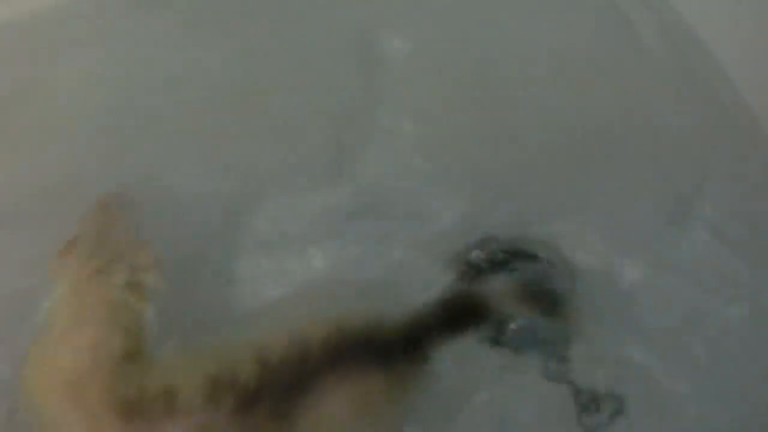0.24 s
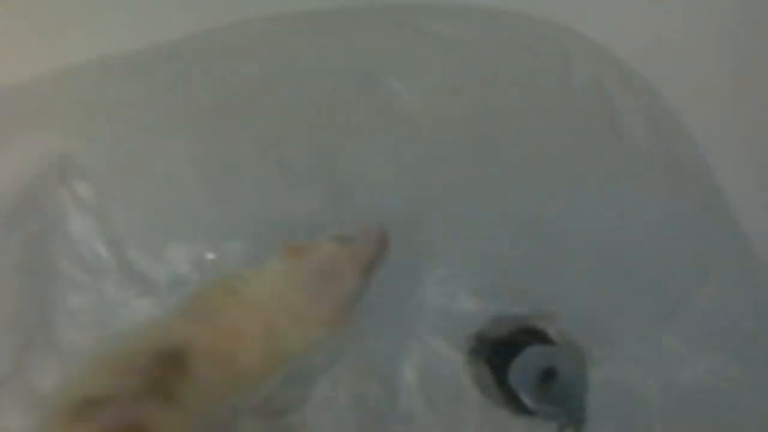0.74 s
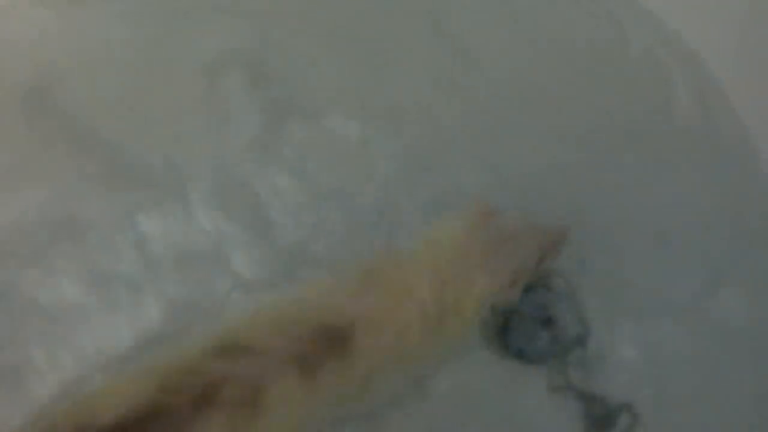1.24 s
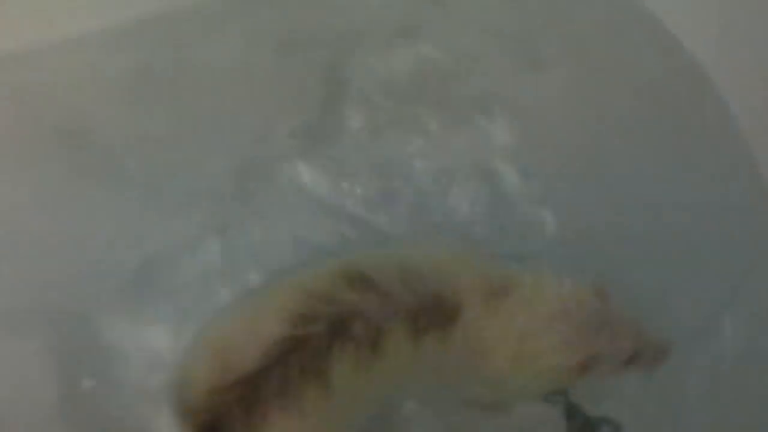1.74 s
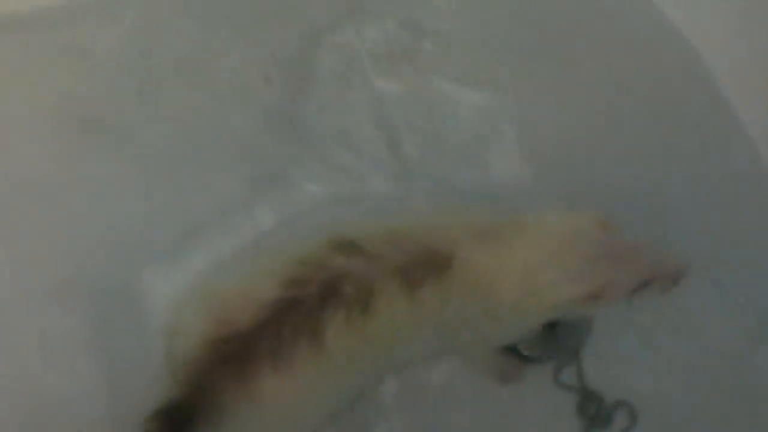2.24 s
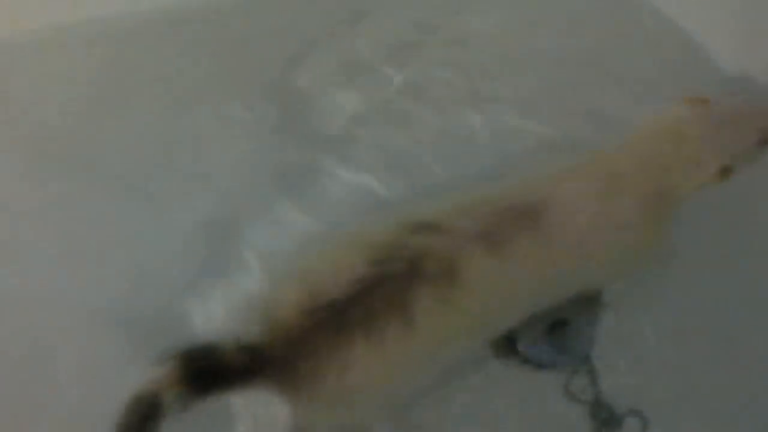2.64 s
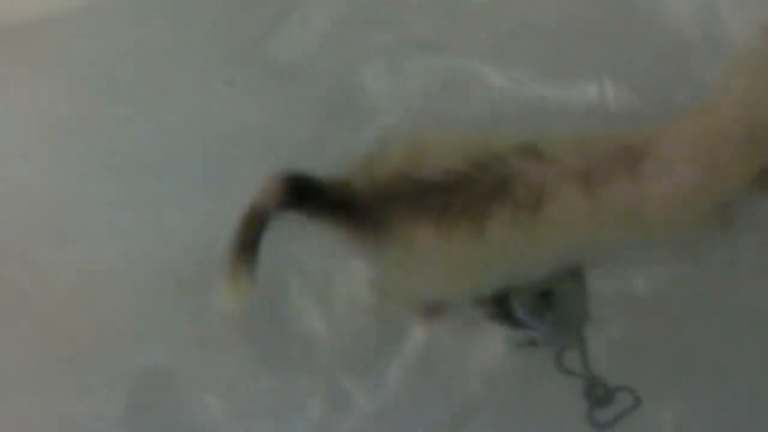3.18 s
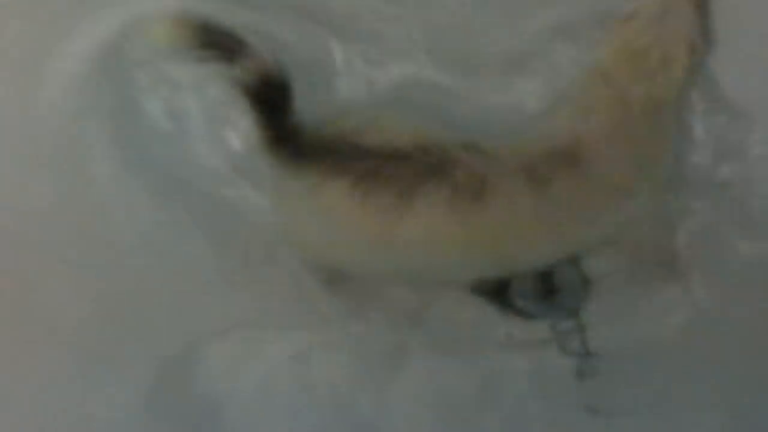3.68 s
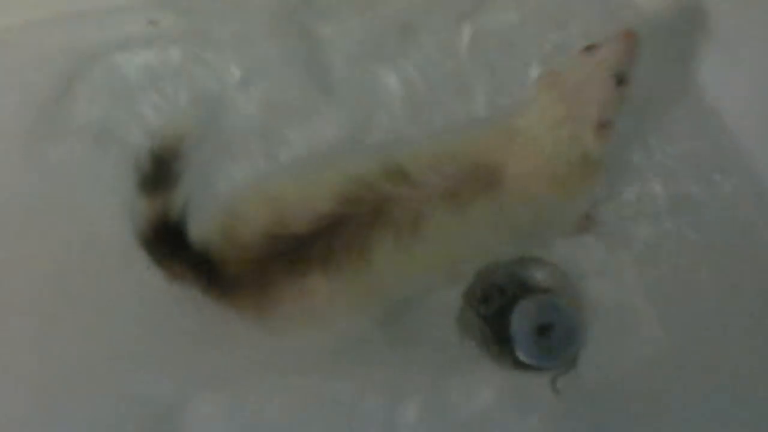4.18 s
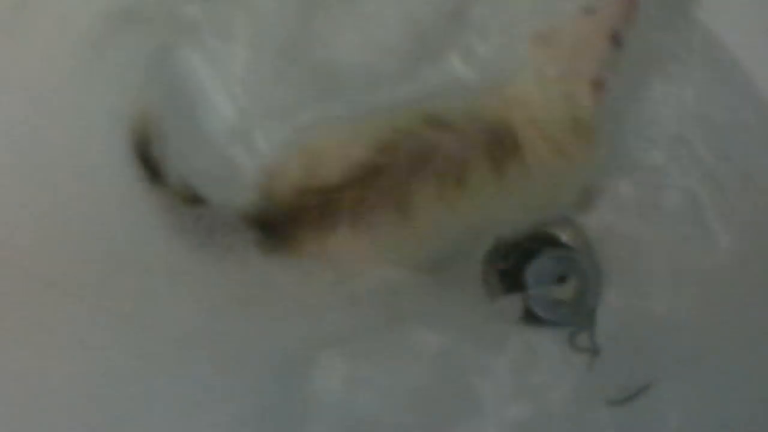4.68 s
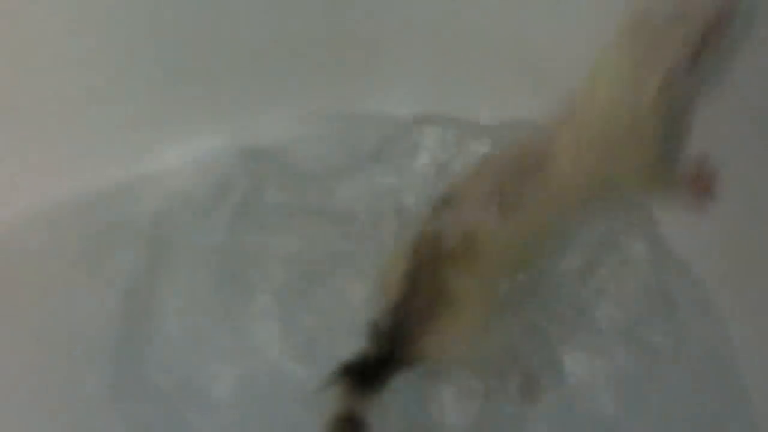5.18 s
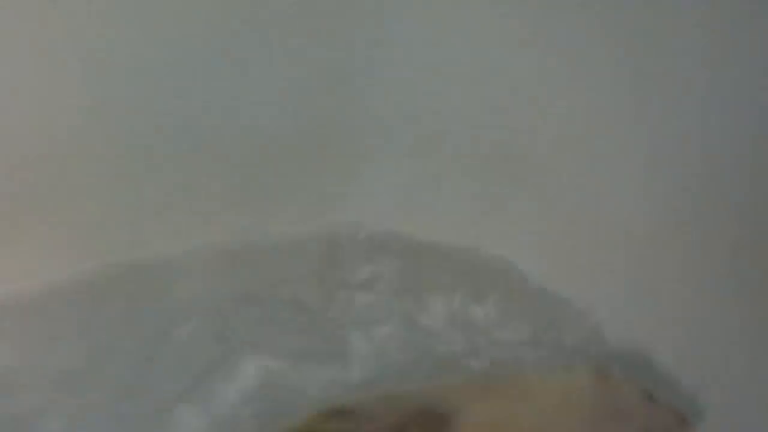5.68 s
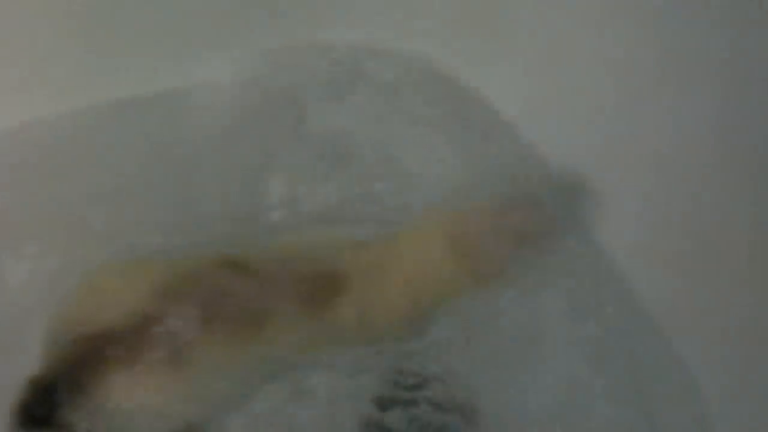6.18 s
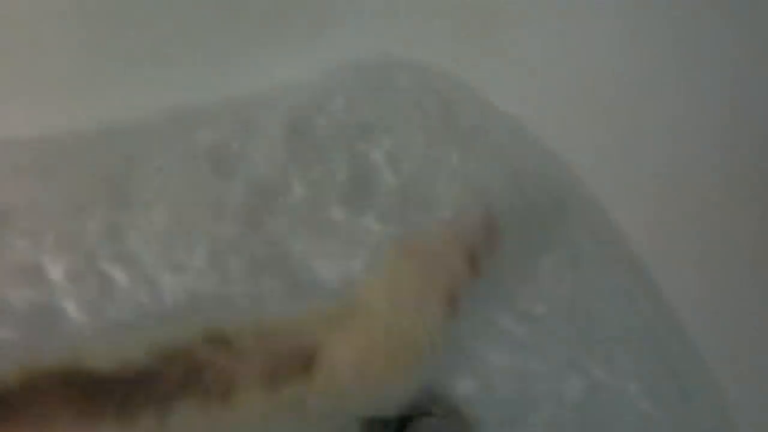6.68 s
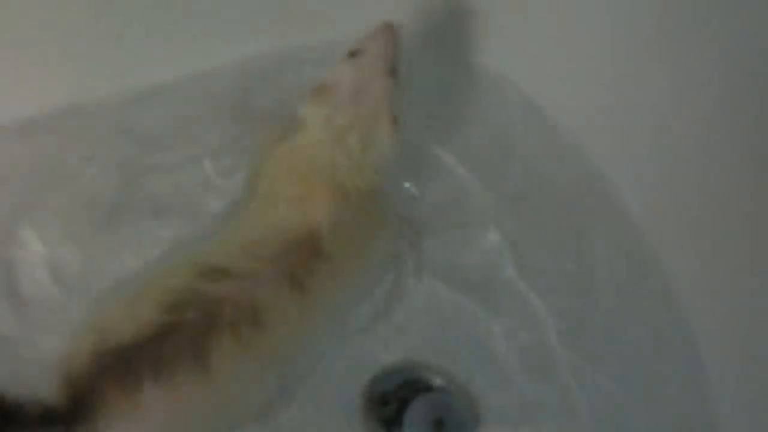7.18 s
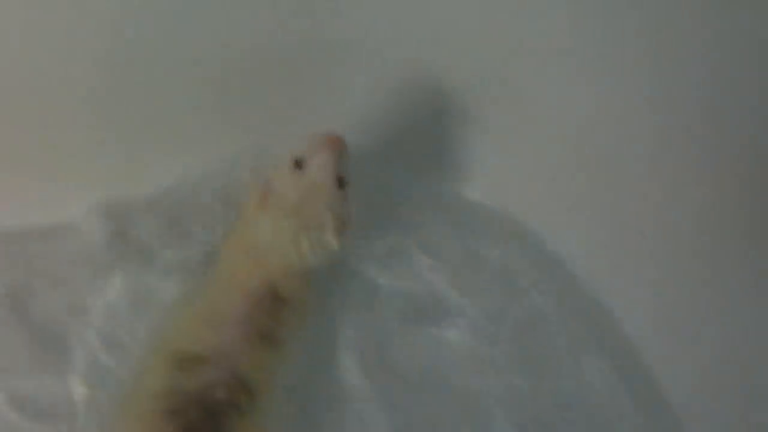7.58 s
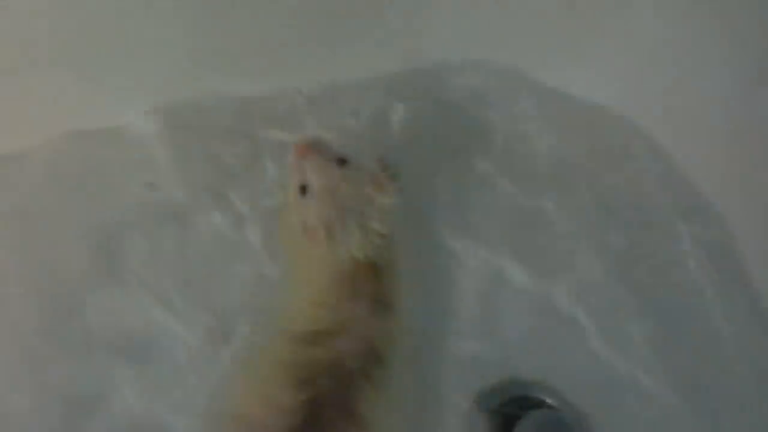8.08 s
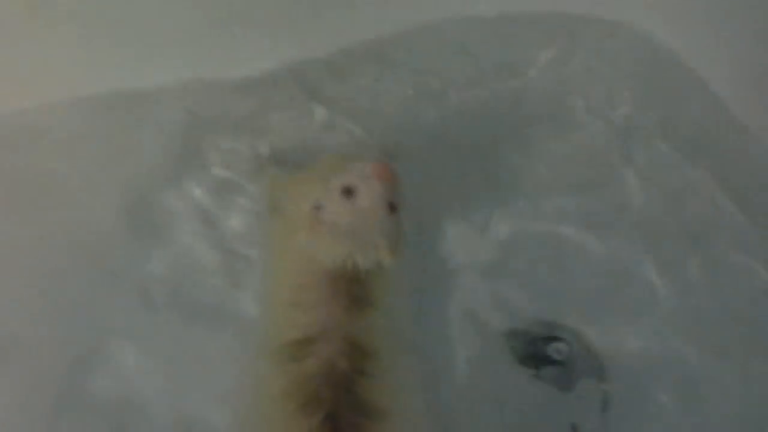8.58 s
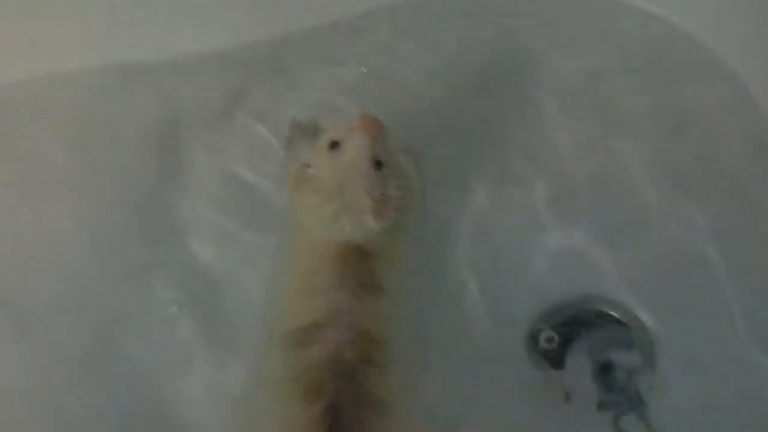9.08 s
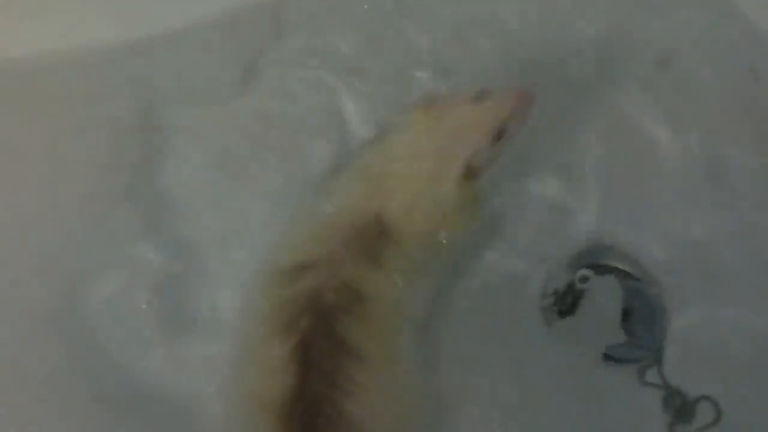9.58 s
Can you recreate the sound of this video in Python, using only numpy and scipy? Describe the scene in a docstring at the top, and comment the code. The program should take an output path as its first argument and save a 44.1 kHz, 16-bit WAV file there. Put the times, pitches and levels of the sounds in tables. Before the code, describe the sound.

A close stereo microphone catches a ferret paddling in a shallow bathtub in a small, hard room with short bright reflections, over low, steady, slightly wavering room noise. A quick swish of wet fur opens at 0 s, followed by near quiet with a faint tick. From 0.9 to 1.25 s, quick paw slaps splash with bubbles and fine spray. Soft swishes and tiny drips follow, then one sharp watery plip at 3.0 s and faint stirring near 3.6 s. At 4.9-5.3 s comes the fullest splash, with ringing bubbles, gurgle and a soft tub thud; a click and drip follow at 5.4 s. A brighter, crackling flurry runs from 6.15 to 6.5 s. A small rising gurgle sounds at 7.3 s, then dull handling knocks near 7.85 s. Faint rustles and sparse ticks continue to about 9.7 s.

```python
"""A swish of wet fur opens the scene; then a ferret paddles in bursts in a shallow bathtub, close by.
Paw slaps are grainy noise bursts, bubbles and a few clicks are rising sine rings, and spray is noise with
droplet crackle. Drops and claws tick, the tub thuds softly on damped low modes, and a hand knocks the
camera's case. Tub-wall echoes and the tail of a small hard room follow the water; steady coloured noise
lies beneath."""
import sys
import numpy as np
from scipy import signal
from scipy.fft import rfft, irfft
from scipy.io import wavfile
from scipy.ndimage import uniform_filter1d

SR = 44100
rng = np.random.default_rng(int(sys.argv[2]) if len(sys.argv) > 2 else 0)


def digitize_waveform(pressure):
    """Quantize a signal to 16-bit integers and store it at the path in sys.argv[1].

    Rows of a 2-D input are taken as channels; values are limited to [-1, 1].
    """
    field = np.atleast_2d(pressure).T
    bounded = np.clip(field, -1, 1)
    quanta = np.round(bounded * 32767).astype(np.int16)
    wavfile.write(sys.argv[1], SR, quanta)


N = 433944
TIME = np.arange(N) / SR
FREQS = np.fft.rfftfreq(N, 1 / SR)
SIDES = np.array([[.5], [-.5]])  # shares a left-minus-right difference between the channels


def amp(db):
    """Decibels to gain."""
    return 10 ** (np.asarray(db) / 20)


def unit(x):
    """Scales to rms 1."""
    return x / np.sqrt(np.mean(x ** 2) + 1e-20)


def read(points, hz):
    """Reads a table on a log-frequency axis."""
    f, value = np.transpose(points)
    return np.interp(np.log(hz + 1), np.log(f + 1), value)


def add(mix, s, sound):
    """Adds a sound into the mix at time s, cut off at the end of the mix."""
    part = mix[:, max(round(s * SR), 0):][:, :sound.shape[1]]
    part += sound[:, :part.shape[1]]


def colour(x, db):
    """Filters a full-length signal by a gain in dB for each frequency."""
    return irfft(rfft(x) * amp(db), N)


def drift(pace):
    """Slow chance: a new random value every pace seconds, joined by straight lines."""
    knots = rng.standard_normal(1024)
    return np.interp(TIME, np.arange(len(knots)) * pace, knots)


# Likeness of the two microphones in diffuse sound. Each row: frequency in Hz, correlation from 0 to 1.
MIC_LIKENESS = [(50, .86), (200, .84), (500, .95), (1200, .93), (2500, .75), (4500, .45), (9000, .4),
                (16000, .45)]


def diffuse(pair, likeness=MIC_LIKENESS):
    """Blends two unrelated signals so that the channels are as alike as the table asks at each pitch."""
    a, b = rfft(pair)
    same = np.clip(read(likeness, np.fft.rfftfreq(pair.shape[1], 1 / SR)), -1, 1)
    left = same * a + np.sqrt(1 - same ** 2) * b
    return irfft(np.array([left, a]), pair.shape[1])


def impact(pitch, bass_db, treble_db, decay, ring_db, ring_octaves, attack, grain_db, count=6):
    """A brief grainy burst, boosted around the given pitch."""
    t, hz = np.arange(2048) / SR, np.fft.rfftfreq(2048, 1 / SR)
    noise, flicker = rng.standard_normal((2, len(t))), rng.standard_normal((count, 1, len(t)))

    # bass, middle and treble levels, spread over the width of each band
    band_hz, band_width = np.array([1100, 3300, 10000]), np.array([1200, 4200, 10000])
    per_hz = np.array([bass_db, 0, treble_db]) - 10 * np.log10(band_width)
    gain = amp(read(np.c_[band_hz, per_hz], hz))
    gain *= hz ** 2 / (hz ** 2 + 650 ** 2)  # thins out the low end
    octaves_off = np.log2((hz + 1) / pitch)
    gain *= amp(ring_db * np.exp(-(octaves_off / ring_octaves) ** 2))

    # droplets of each size sound in their own band and come in their own clumps
    centres = np.geomspace(1500, 14000, count)
    sizes = np.array([np.interp(hz, centres, one) for one in np.eye(count)])
    droplets = irfft(rfft(diffuse(noise)) * gain * sizes[:, None])
    clumps = amp(grain_db * np.clip(unit(uniform_filter1d(flicker, size=48)), -2, 2))
    shape = (1 - np.exp(-t / attack)) * np.exp(-t / max(decay, attack))
    burst = unit((droplets * clumps).sum(0) * shape)
    return burst * np.sqrt(np.mean(shape ** 2)) / shape.max()


# Paw slaps on the water. Each row: start in seconds, relative level in dB, cavity pitch in Hz,
# relative bass over middle in dB, relative treble over middle in dB.
PAW_SLAPS = [(0.882, -14.5, 2200, -20, -6), (0.927, -8.5, 3000, -16, -13), (0.945, -13, 3100, -24, -21),
             (0.959, -11, 2790, 0, -4), (1.002, -9.5, 4580, -6, -1), (1.02, -10, 3070, -18, -2),
             (1.037, -18, 2160, -20, -8), (1.061, -10.5, 1840, -14, -17), (1.07, -0.5, 2620, -20, -13.5),
             (1.087, -12, 2800, -25, -10), (1.145, -7, 1180, -9, -13), (1.158, -13, 1290, -21, -4),
             (1.181, -18, 2310, -11, -13), (1.221, -18, 3790, -1, 5), (3.027, -20.5, 3260, 0, -8),
             (3.038, -8, 6900, -19, -12.5), (4.961, -10.5, 3480, -11, 2.5), (5.066, -6.5, 2150, 2, 1),
             (5.093, -1.5, 3250, -11, -6), (5.103, -0.5, 990, -1, -3.5), (5.127, -3, 3250, 4, -14),
             (5.183, -9, 1460, 19, 8), (5.211, -5, 1040, 12, -20), (5.231, -13, 1630, 14, -1),
             (5.266, -3, 2170, -12, -34), (6.158, -15, 5280, -23, -3), (6.166, -10.5, 2110, 1, 6),
             (6.197, -8, 2880, -8, -9), (6.232, -4, 4020, -6, 5.5), (6.268, -6.5, 3080, -16, -1.5),
             (6.293, -10, 5960, -14, 10), (6.301, -9, 4310, -25, -14), (6.33, -14, 2250, -15, -2),
             (6.338, -8, 2880, -17, -8), (6.372, -4, 5260, -23, -7), (6.408, -4, 2800, -19, -7),
             (6.446, -8, 2350, -31, -9), (6.462, -17, 3670, -28, -13), (6.486, -6.5, 3670, -21, 8),
             (6.496, -9, 2970, -26, -7), (7.271, -19.5, 2900, -10, -7), (7.291, -12.5, 4870, 0, -8)]


def slaps(gain_db, low_db, high_db):
    """Paws hit the surface: deep strokes sound full, glancing ones bright."""
    out = np.zeros((2, N))
    for s, db, pitch, bass_db, treble_db in PAW_SLAPS:
        burst = impact(pitch, bass_db + low_db, treble_db + high_db, decay=0.0042,
                       ring_db=8.0, ring_octaves=0.23, attack=0.0013, grain_db=3.0)
        add(out, s, amp(db + gain_db) * burst)
    return out


def rising_ring(hz, decay, rise, swell, lead):
    """A decaying sine climbs in pitch, as an air pocket nearing the surface does; the left leads by lead s."""
    t = np.maximum(np.arange(0, 6 * decay + swell, 1 / SR) - np.array([[0], [lead]]), 0)
    shape = (1 - np.exp(-t / swell)) * np.exp(-t / decay)
    turns = hz * t * (1 + rise * t / decay / 2)
    return shape / shape.max() * np.sin(2 * np.pi * turns)


def swarm(low_hz, high_hz, cycles, spread_db, rise, count):
    """A third of a second of random bubbles at rms 1, count a second; most are of middling pitch."""
    out = np.zeros((2, SR // 3))
    for k, (when, a, b, size, side) in enumerate(rng.random((count // 3, 5))):
        hz = low_hz * (high_hz / low_hz) ** ((a + b) / 2)
        gain = amp(spread_db * min(-np.log(size), 2)) * np.sqrt(hz)
        bubble = rising_ring(hz, cycles / hz, rise, swell=1 / hz, lead=side * 4 / SR)
        add(out, (k + when) / count, gain * bubble)
    return unit(out)


def stir(length):
    """The envelope of stirred water: it builds, holds for the stroke and settles."""
    attack_s, release_s = 0.022, 0.02
    t = np.arange(SR // 3) / SR
    return np.minimum(t / attack_s, 1) * np.exp(-np.maximum(t - length, 0) / release_s)


# Strokes of the body through the water. Each row: start in seconds, length in seconds, then relative
# levels in dB of the surge, the gurgle of large bubbles, the froth of small ones, and the spray.
STROKES = [(0.862, 0.21, -53, -55, -28.5, -33), (1.064, 0.085, -46, -52, -25, -30.5),
           (1.134, 0.074, -46, -43, -29.5, -35.5), (3.001, 0.064, -53, -42, -31, -37.5),
           (3.582, 0.11, -54, -60, -41.5, -52), (3.679, 0.15, -55, -45.5, -46.5, -63),
           (4.946, 0.19, -54, -43, -29.5, -34.5), (5.06, 0.11, -50, -28.5, -22, -30),
           (5.175, 0.12, -38.5, -47, -33, -32), (6.129, 0.08, -47.5, -48, -35.5, -34),
           (6.18, 0.302, -53.5, -63, -27.5, -33), (7.275, 0.059, -36.5, -26.5, -30, -40)]
# Colour of the pushed water. Each row: frequency in Hz, relative gain in dB.
PUSH_COLOUR = [(20, -15), (60, 10), (130, 13), (210, -7), (340, -5), (520, 7), (800, -26), (2000, -73)]


def churn(surge_db, gurgle_db, froth_db):
    """Paddling pushes the water about, a low surge, and folds in large and small bubbles."""
    push, out = np.zeros((1, N)), np.zeros((2, N))
    for s, length, surge, gurgle, froth, _ in STROKES:
        large = swarm(low_hz=600, high_hz=1935, cycles=3.8, spread_db=8.0, rise=0.038, count=500)
        small = swarm(low_hz=1150, high_hz=7010, cycles=2.6, spread_db=12.5, rise=0.044, count=900)
        bubbles = amp(gurgle + gurgle_db) * large + amp(froth + froth_db) * small
        add(out, s, stir(length) * bubbles)
        add(push, s, amp(surge + surge_db) * stir(length)[None])
    surge_noise = unit(colour(rng.standard_normal(N), read(PUSH_COLOUR, FREQS)))
    return out + push * surge_noise


# Short rings that stand out one by one: bubbles, and the ring of a few clicks and ticks.
# Each row: start in seconds, starting pitch in Hz, relative level in dB, cycles in one decay time,
# pitch rise in that time as a share.
SHORT_RINGS = [(0.140, 330, -38, 3.4, .02), (0.155, 614, -33.5, 2.1, .03), (0.403, 5370, -22.5, 7.4, .02),
               (0.426, 2260, -33, 8, 0.011), (0.629, 2720, -37.5, 9, .01), (0.900, 2210, -22, 11, .026),
               (0.9277, 3010, -9.5, 4.6, .02), (0.944, 1380, -25, 6.1, .03), (0.954, 2280, -23, 9, .02),
               (1.001, 1370, -22, 3.2, .046), (1.072, 2770, -15, 7, .02), (1.145, 960, -22, 4.5, .04),
               (1.157, 1240, -20.5, 9.2, 0.028), (1.290, 1600, -40.5, 18, .03), (3.038, 6860, -2, 3, 0.02),
               (3.038, 1066, -31.5, 4.2, 0.022), (3.038, 2080, -16, 3.9, 0.012),
               (3.040, 1577, -28.5, 16, .005), (3.569, 13400, -20, 13, .01), (3.673, 957, -32.5, 5.9, .01),
               (3.690, 2820, -23, 7, 0.068), (3.695, 836, -31, 11, .01), (4.847, 1690, -25.5, 6, .02),
               (4.849, 2200, -25.5, 7, .02), (4.866, 618, -27, 2, .04), (5.028, 2240, -23, 8, 0.018),
               (5.080, 1624, -10.5, 6, .035), (5.093, 3045, 0, 5.1, .023), (5.102, 900, -18, 8, .02),
               (5.127, 3180, -16, 6.3, .02), (5.196, 868, -11.5, 7.8, 0.037),
               (5.214, 1112, -15.5, 14, 0.048), (5.211, 2350, -12, 6.2, .022),
               (5.224, 1224, -16, 11, 0.068), (5.232, 1600, -15, 6.5, .025), (5.267, 2060, -9, 4.5, .02),
               (5.384, 3890, -24.5, 10, 0.0092), (5.412, 5500, -7, 2.4, .028), (5.715, 1300, -37, 4, .02),
               (6.173, 2020, -27, 8.6, .04), (6.203, 4270, -20, 10, 0.043), (6.245, 2370, -18.5, 7, .06),
               (6.300, 2420, -14, 7, .02), (6.302, 4310, -10, 11, 0.023), (6.330, 2140, -10.5, 6.4, 0.048),
               (6.382, 3210, -21, 9.8, 0.045), (6.447, 2260, -18, 8, 0.018), (7.249, 1216, -20.5, 26, 0.11),
               (7.270, 1580, -16, 8.9, 0.16), (7.290, 900, -28, 3, 0.024), (7.293, 2340, -22.5, 8.9, .02),
               (7.297, 492, -18, 4.5, .006), (7.317, 1127, -19.5, 23, 0.049), (7.322, 940, -26, 19, 0.018),
               (7.422, 2200, -30, 3.9, 0.018), (8.203, 6200, -26, 12, 0.0098),
               (8.244, 1343, -29, 8.6, .009), (9.429, 5430, -18.5, 7.6, .01)]


def single_rings(gain_db, pan_db):
    """Single bubbles and clicks ring; for the same cycle count, lower ones swell and die more slowly."""
    out = np.zeros((2, N))
    leads = rng.uniform(0, 3 / SR, len(SHORT_RINGS))
    for (s, hz, db, cycles, rise), lead in zip(SHORT_RINGS, leads):
        ring = rising_ring(hz, cycles / hz, rise, swell=1.13 / hz, lead=lead)
        add(out, s, amp(db + gain_db + SIDES * pan_db) * ring)
    return out


# Swishes of wet fur. Each row: strongest moment in seconds, length in seconds, relative level in dB.
FUR_SWISHES = [(0.017, 0.053, -23.5), (0.203, 0.23, -44.5), (0.491, 0.091, -40), (0.852, 0.04, -38.5),
               (1.205, 0.082, -34), (1.45, 0.07, -33), (1.533, 0.072, -38.5), (2.258, 0.18, -43.5),
               (2.488, 0.078, -36.5), (2.736, 0.046, -36.5), (2.81, 0.06, -43.5), (3.219, 0.08, -41.5),
               (3.307, 0.03, -43), (3.388, 0.055, -44), (3.47, 0.072, -45.5), (3.604, 0.048, -42),
               (3.695, 0.12, -43), (4.167, 0.047, -47.5), (4.662, 0.11, -42), (4.877, 0.022, -34),
               (4.967, 0.035, -23.5), (5.405, 0.089, -41), (5.515, 0.095, -44.5), (5.834, 0.15, -48),
               (6.086, 0.094, -44.5), (6.5, 0.06, -38.5), (6.683, 0.11, -40.5), (6.84, 0.24, -42),
               (6.962, 0.083, -41), (7.17, 0.05, -37), (7.261, 0.1, -35.5), (7.474, 0.061, -37.5),
               (7.649, 0.065, -40.5), (8.121, 0.073, -43.5), (8.284, 0.038, -40), (8.56, 0.036, -43),
               (8.977, 0.065, -41), (9.181, 0.051, -42.5), (9.46, 0.028, -43), (9.653, 0.047, -38.5),
               (9.722, 0.13, -42)]


def spray_level():
    """How much water is flung about: a faint rustle, each swish of fur and each stroke, summed in power."""
    rise, fall = 0.41, 0.51  # shares of a swish's length
    rustle_db = -52 + 1 * drift(pace=0.099)
    power = amp(rustle_db)[None] ** 2
    for s, length, db in FUR_SWISHES:
        u = (TIME - s) / length
        near = abs(u) < 3
        bell = np.exp(-(u[near] / np.where(u[near] < 0, rise, fall)) ** 2)
        power[0, near] += (amp(db) * bell) ** 2
    for s, length, *_, db in STROKES:
        add(power, s, (amp(db) * stir(length)[None]) ** 2)
    return np.sqrt(power[0])


# Colour of spray and swishing fur. Each row: frequency in Hz, relative gain in dB.
SPRAY_TONE = [(500, -35), (1500, -11.5), (3200, -1.5), (5000, 0.5), (7000, 0), (10000, 0), (13000, -0.5),
              (16000, -0.5)]


def spray(gain_db, per_s, spread_db, hiss, crackle_db):
    """Wet fur swishes smoothly; harder strokes fling tiny droplets that crackle."""
    sizes = amp(spread_db * np.minimum(rng.exponential(1, N), 4))
    sizes *= rng.random(N) < per_s / SR  # only the samples where a droplet lands
    drops = diffuse(rng.standard_normal((2, N))) * sizes
    swish = diffuse(rng.standard_normal((2, N)))
    stroke = spray_level()
    crackle = stroke / (stroke + amp(crackle_db))
    blend = (crackle * unit(drops) + hiss * swish) / np.hypot(crackle, hiss)
    fizz = colour(blend, read(SPRAY_TONE, FREQS))
    return amp(gain_db) * stroke * unit(fizz)


# Drops and claw ticks. Each row: start in seconds, relative level in dB, ring pitch in Hz,
# relative treble over middle in dB.
DROP_TICKS = [(0.3885, -25, 12600, 6), (0.8375, -28.5, 3170, 6), (1.4265, -19, 15100, 14),
              (1.77, -30, 14000, 22), (2.7198, -24, 11400, 16), (4.8168, -24, 4900, 0),
              (4.8457, -21, 6940, -3), (4.8646, -27, 3650, 0), (4.9424, -15, 10400, 4),
              (4.952, -16, 4400, 12), (5.3223, -12.5, 3260, 27), (5.4113, -12, 5180, 11),
              (5.5588, -24.5, 8910, 21), (5.662, -28, 12700, 30), (6.1263, -19, 10200, 7),
              (6.308, -11, 4570, 3), (6.8423, -21, 6800, 17), (6.9207, -19.5, 14700, 9),
              (7.1604, -25, 13100, -6), (7.4222, -20, 9930, -0.5), (7.889, -20, 5000, 7.5),
              (7.9798, -21.5, 7100, 2.5), (8.2028, -28, 5930, 13), (8.2432, -23.5, 3730, 17),
              (9.4266, -18.5, 5540, 24), (9.6365, -23, 13900, 17)]


def ticks(gain_db, high_db, pan_db):
    """Drops and claws strike the water and the tub, sharp and short."""
    out = np.zeros((2, N))
    for s, db, pitch, treble_db in DROP_TICKS:
        burst = impact(pitch, -9.5, treble_db + high_db, decay=0.0015,
                       ring_db=7.0, ring_octaves=0.47, attack=.0001, grain_db=4.0)
        add(out, s, amp(db + gain_db + SIDES * pan_db) * burst)
    return out


# Soft bumps against the tub. Each row: start in seconds, relative level in dB.
TUB_BUMPS = [(1.148, -39), (5.135, -24), (5.196, -34), (7.289, -39), (7.805, -42.5)]
# Modes of the tub shell. Each row: frequency in Hz, relative level in dB.
TUB_MODES = [(64, -11), (118, -7), (160, -12), (245, -21), (335, -2.5)]


def bumps(decay):
    """A push on the tub wakes its low, quickly damped modes."""
    out, t = np.zeros((2, N)), np.arange(SR // 4) / SR
    ring = sum(amp(db) * np.sin(2 * np.pi * hz * t) for hz, db in TUB_MODES)
    for s, db in TUB_BUMPS:
        add(out, s, amp(db) * ring[None] * np.exp(-t / decay))
    return out


# Dry knocks of a hand on the camera. Each row: start in seconds, relative level in dB.
HAND_KNOCKS = [(7.8358, -32), (7.891, -26.5)]
# Modes of the camera's case. Each row: frequency in Hz, relative level in dB, decay in seconds.
CASE_MODES = [(99, -12, 0.0061), (430, -24, .003), (670, 1.5, 0.0037), (940, 0.5, 0.0016)]


def knocks(pan_db):
    """Handling reaches the microphones through the case, without any room."""
    out, t = np.zeros((2, N)), np.arange(SR // 10) / SR
    ring = sum(amp(db) * np.sin(2 * np.pi * hz * t) * np.exp(-t / decay) for hz, db, decay in CASE_MODES)
    for s, db in HAND_KNOCKS:
        add(out, s, amp(db + SIDES * pan_db) * ring)
    return out


# Echoes from the tub walls. Each row: left delay in seconds, right delay in seconds, relative gain.
WALL_ECHOES = [(.0010, 0.00102, 0.099), (.0024, 0.0022, -0.65), (.0043, .00425, 0.28), (.0062, .0063, .2),
               (.0087, .0086, -0.19)]
# Strength of the room's tail. Each row: frequency in Hz, relative level in dB.
TAIL_COLOUR = [(60, -26), (200, -7), (500, 8), (1200, 3), (3000, 4), (6000, 2), (10000, 2.5), (16000, -6.5)]
# Room decay. Each row: frequency in Hz, time to fall by 60 dB in seconds.
TAIL_T60 = [(100, 0.58), (500, 0.39), (1200, 0.29), (3000, 0.29), (8000, 0.31), (16000, 0.21)]


def bathroom(x, wet_db, walls_db, build):
    """Direct sound, echoes from the tub walls, and a room tail that builds up and dies by frequency."""
    t = np.arange(32768) / SR
    hz, when, z = signal.stft(diffuse(rng.standard_normal((2, len(t)))), SR, nperseg=256)
    z *= amp(read(TAIL_COLOUR, hz)[:, None] - 60 * when / read(TAIL_T60, hz)[:, None])
    tail = signal.istft(z, SR, nperseg=256)[1][:, :len(t)] * (1 - np.exp(-t / build))
    echo = amp(wet_db) * tail / np.linalg.norm(tail[0])
    echo[:, 0] += 1  # direct sound
    for left, right, gain in WALL_ECHOES:
        echo[[0, 1], [round(left * SR), round(right * SR)]] += gain * amp(walls_db)
    return signal.oaconvolve(x, echo, axes=1)[:, :N]


# Colour of the room noise. Each row: frequency in Hz, relative gain in dB.
NOISE_COLOUR = [(15, -56), (25, -18), (99, -4.5), (169, -12), (227, -6.5), (368, -5), (399, 0), (433, -2.5),
                (469, 1), (598, -6), (666, 0), (762, -8.5), (919, -8.5), (1530, -14.5), (15500, -25)]
# Resonances and dips in the room noise. Each row: frequency in Hz, width in Hz, boost or cut in dB.
NOISE_MODES = [(93, 9.5, 2.5), (164.6, 15, 5), (256, 39, -6), (398, 120, 1), (468, 65, -2.5),
               (654, 110, -3.5)]
# Likeness of the two microphones in the room noise. Each row: frequency in Hz, correlation from -1 to 1.
NOISE_LIKENESS = [(60, 0.65), (130, 0.72), (290, 0.76), (640, 0.8), (1410, 0.49), (3100, -0.32),
                  (6820, -0.91), (15000, -0.53)]


def ambience(level_db):
    """Steady noise coloured by the room's resonances, with a wavering rumble below."""
    db = read(NOISE_COLOUR, FREQS)
    db = db + sum(boost * np.exp(-((FREQS - hz) / width) ** 2) for hz, width, boost in NOISE_MODES)
    noise = unit(colour(diffuse(rng.standard_normal((2, N)), NOISE_LIKENESS), db))
    rumble_hz, waver_db = 110, 4.5
    rumble = colour(noise, -20 * np.log10(1 + (FREQS / rumble_hz) ** 4))
    waver = amp(waver_db * drift(pace=.12)) - 1
    return amp(level_db) * (noise + rumble * waver)


def scene():
    """Splashes ring in the tub, ticks have their own room blend, and knocks and room noise stay direct."""
    hits = slaps(gain_db=-9.5, low_db=-4.5, high_db=6.0)
    hits += single_rings(gain_db=-2.0, pan_db=-1.3) + bumps(decay=0.03)
    wash = churn(surge_db=-2.0, gurgle_db=-4.5, froth_db=-7)
    wash += spray(gain_db=-0.5, per_s=1500, spread_db=7.5, hiss=0.49, crackle_db=-35)
    water = bathroom(hits + wash, wet_db=-6.5, walls_db=-7.5, build=0.002)
    tick_sound = ticks(gain_db=-3.5, high_db=-3.5, pan_db=-1.8)
    near = bathroom(tick_sound, wet_db=-6, walls_db=-3.5, build=0.00266)
    return water + near + knocks(pan_db=-9.5) + ambience(level_db=-44)


# Sensitivity of the two microphones. Each row: frequency in Hz, left minus right in dB.
MIC_BALANCE = [(30, 0), (100, -4.5), (300, -5), (600, -5.5), (1200, -3), (2200, -2), (4500, -2), (8000, 1),
               (13000, -0.8)]
# How far the left microphone leads. Each row: frequency in Hz, phase in radians.
MIC_LEAD = [(50, .02), (500, .12), (1200, .12), (3000, .3), (8000, .4), (16000, .4)]


def record(dry):
    """Unequal microphones with a narrow treble notch, hard clipping at full scale, and a band limit."""
    notch_db = -19 * np.exp(-((FREQS - 7900) / 130) ** 2) - 5 * np.exp(-((FREQS - 7900) / 700) ** 2)
    gain = amp(notch_db + SIDES * read(MIC_BALANCE, FREQS))
    phase = np.exp(1j * SIDES * read(MIC_LEAD, FREQS))
    heard = np.clip(irfft(rfft(dry) * gain * phase, N), -1, 1)
    edge_hz = 15880
    low_pass = signal.firwin(511, edge_hz, window=("kaiser", 9), fs=SR)
    return signal.oaconvolve(heard, low_pass[None], "same")


dry = scene()
out = record(dry)
digitize_waveform(out)
```